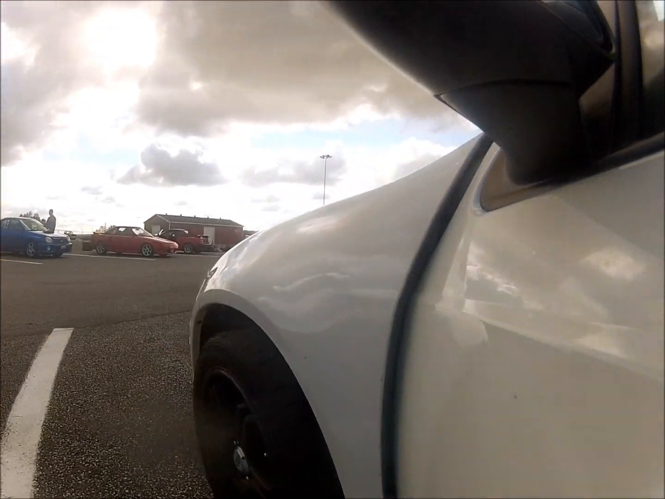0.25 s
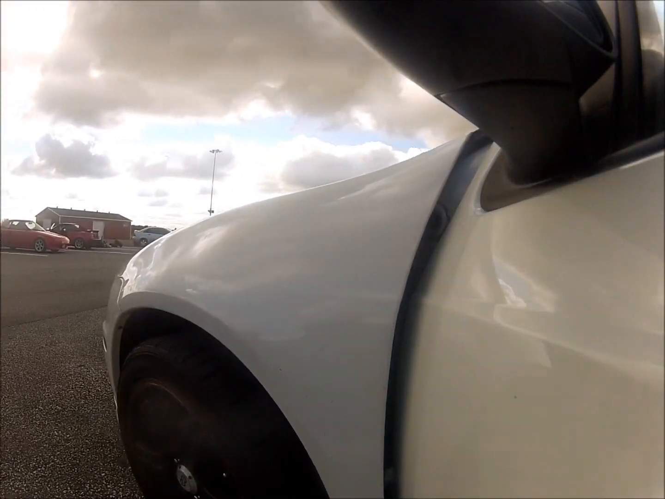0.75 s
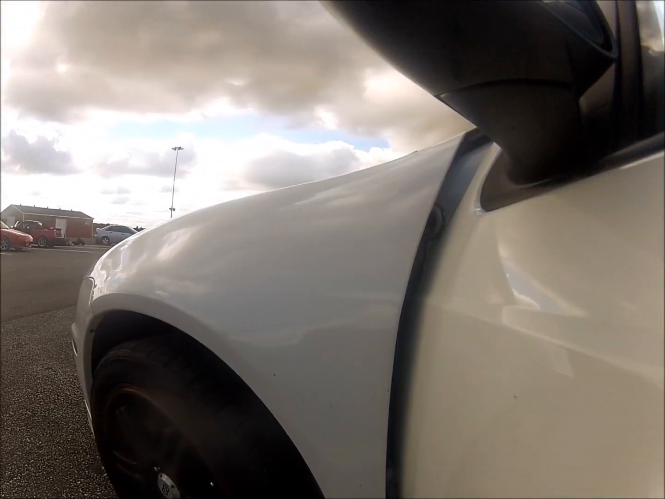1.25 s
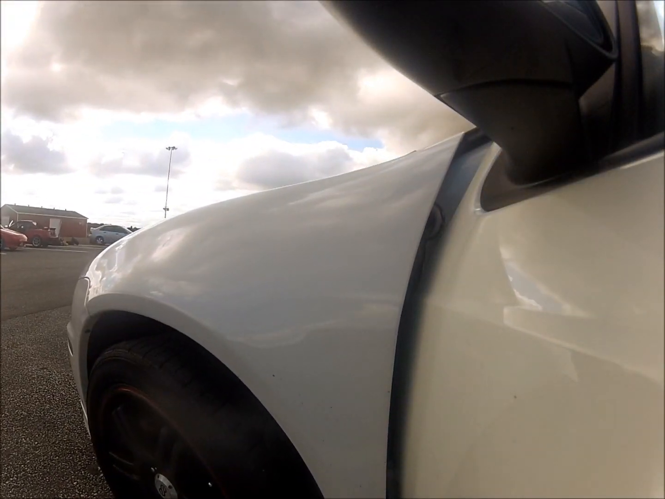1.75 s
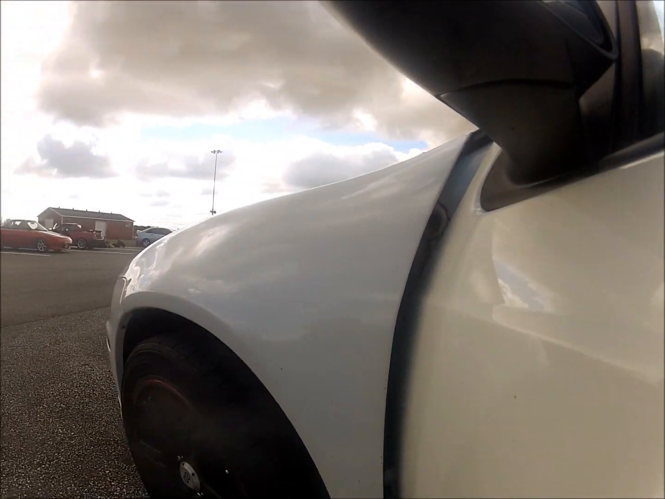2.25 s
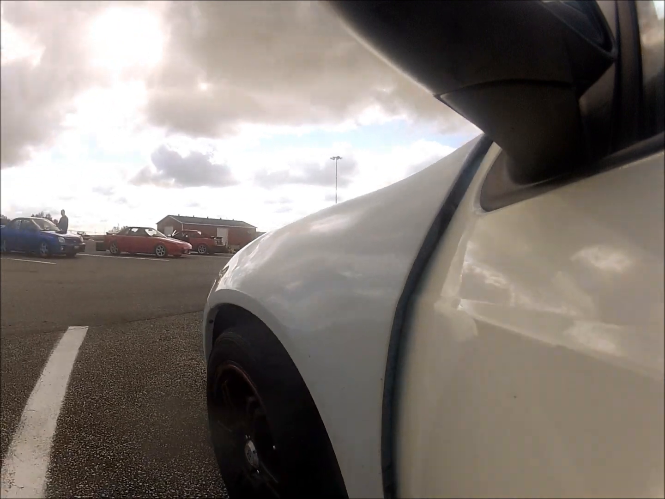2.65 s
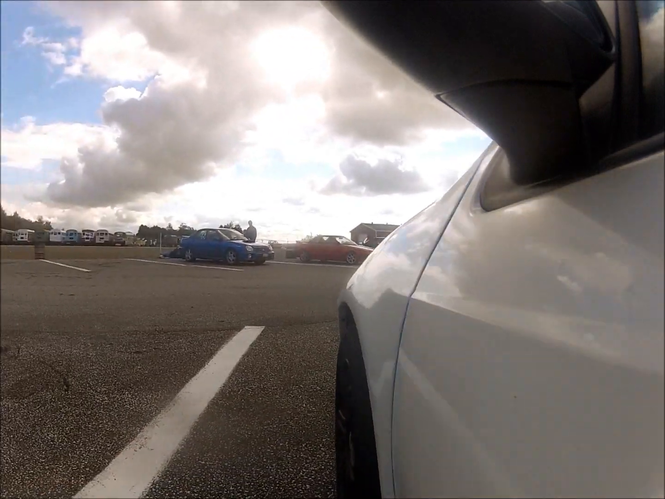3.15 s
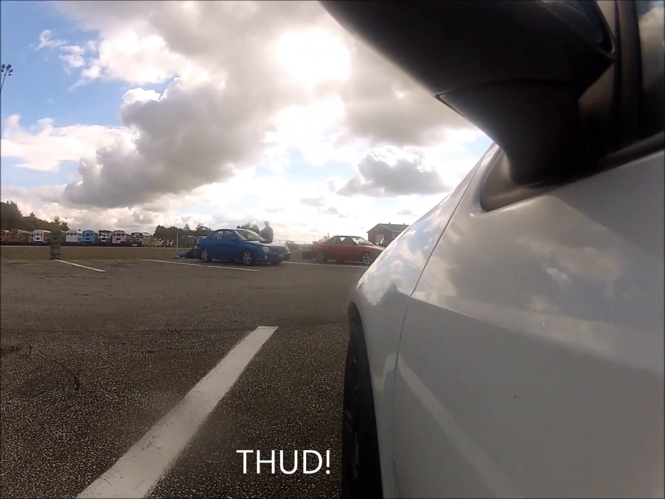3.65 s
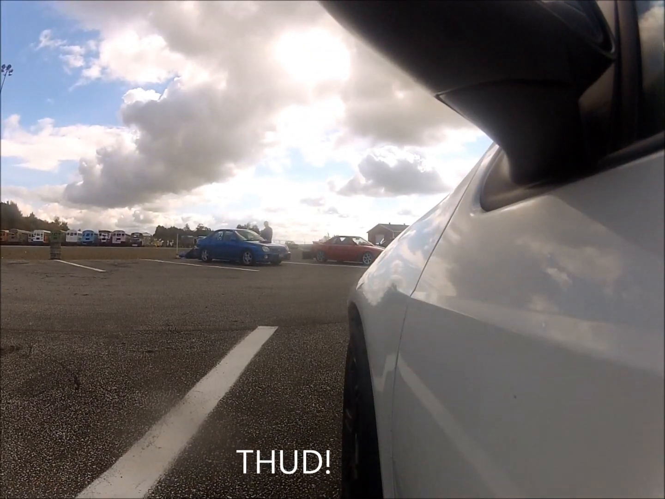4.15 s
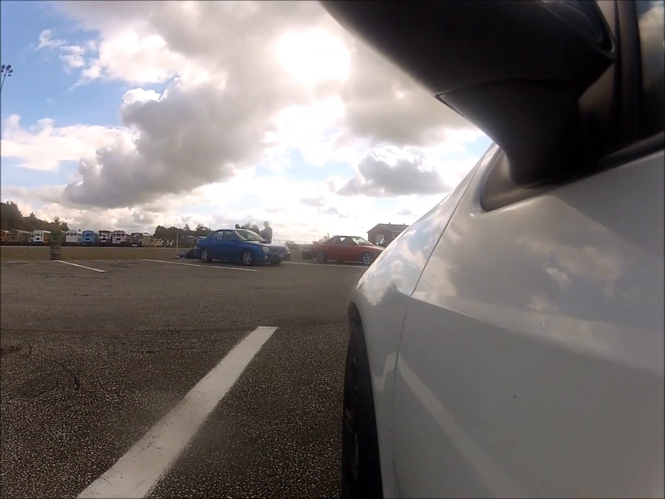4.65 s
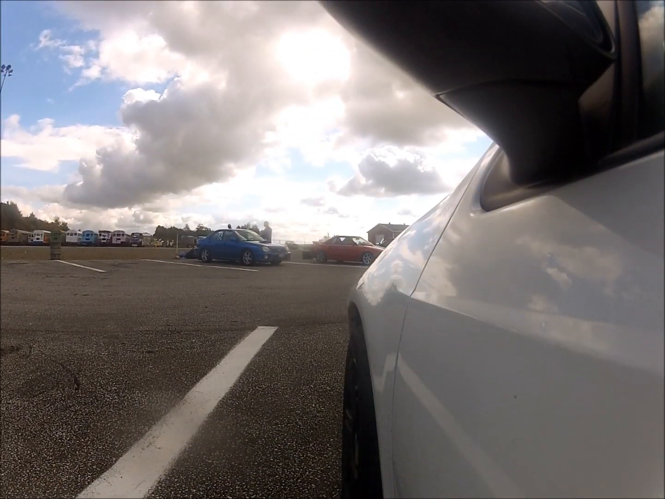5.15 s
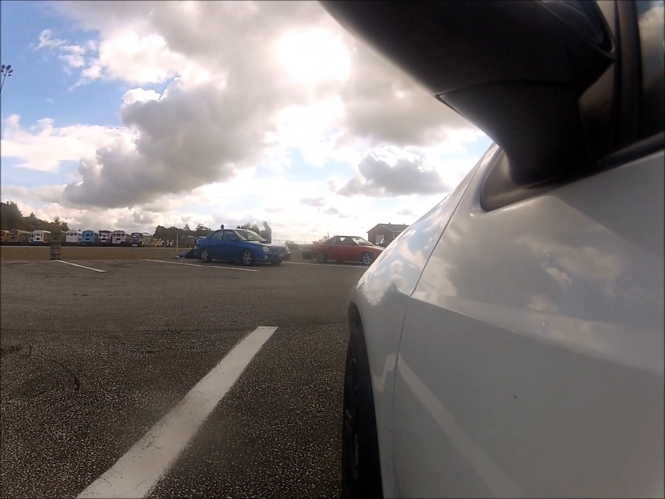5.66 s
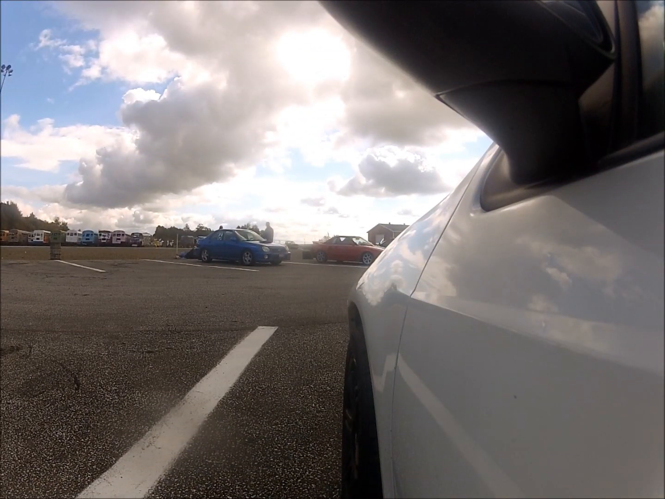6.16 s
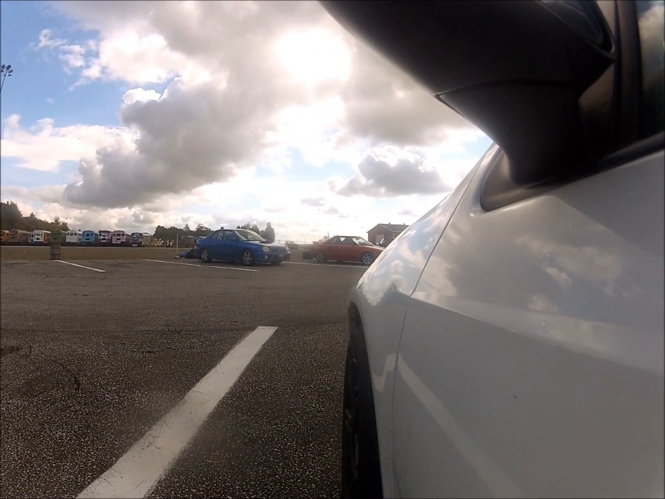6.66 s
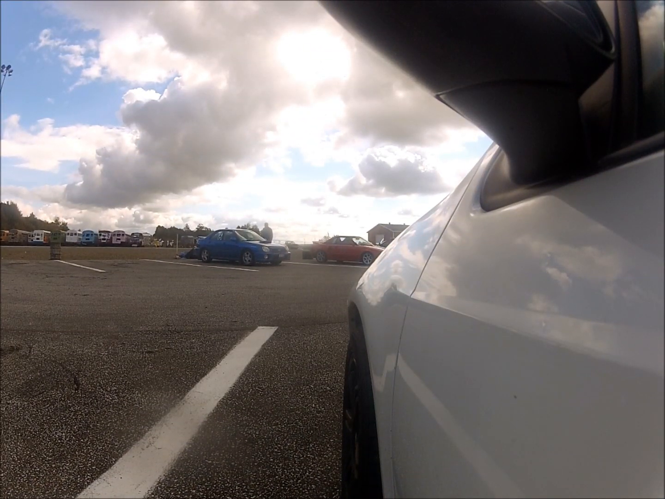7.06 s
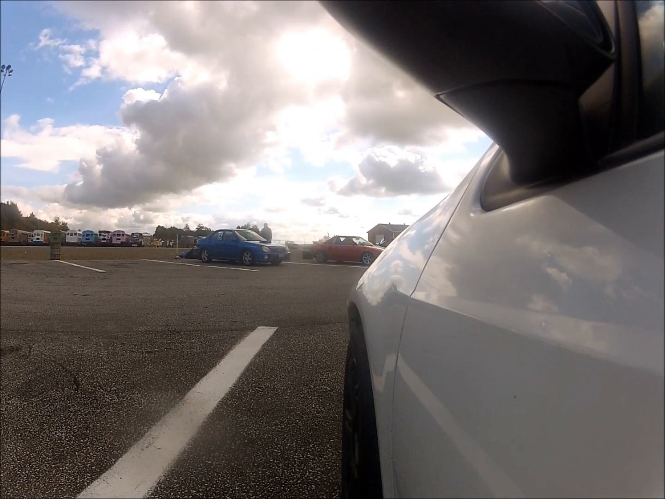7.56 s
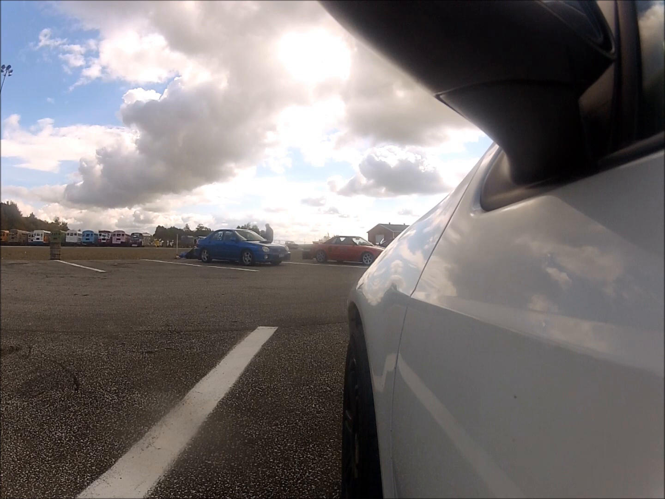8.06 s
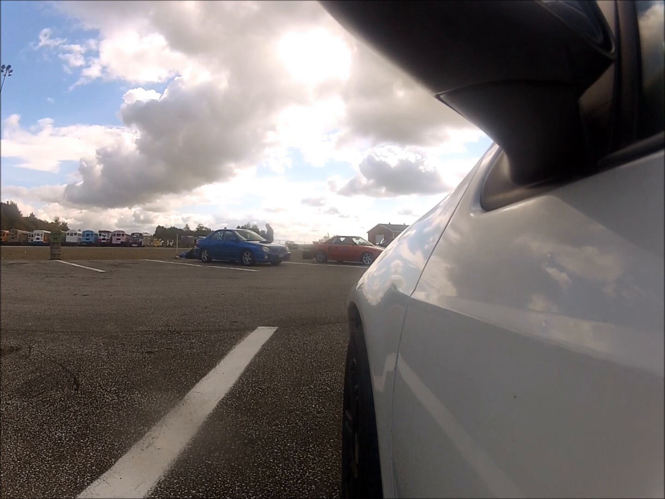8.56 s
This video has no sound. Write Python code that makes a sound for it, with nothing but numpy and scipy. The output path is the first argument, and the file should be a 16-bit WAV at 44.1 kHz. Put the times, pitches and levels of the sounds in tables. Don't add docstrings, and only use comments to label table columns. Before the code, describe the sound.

Muffled clicks as a car door swings open, a huge booming slam with rattling, small cabin knocks and clinks, then the starter motor begins cranking.

```python
import sys
import numpy as np
from scipy import signal
from scipy.fft import rfft, irfft
from scipy.io import wavfile
from scipy.ndimage import uniform_filter1d

SR = 44100
rng = np.random.default_rng(int(sys.argv[2]) if len(sys.argv) > 2 else 0)


def master_out(mix):
    frames = np.transpose(np.atleast_2d(mix))
    ceiling = np.clip(frames, -1, 1)
    pcm = np.round(ceiling * 32767).astype(np.int16)
    wavfile.write(sys.argv[1], SR, pcm)


def decibels_to_gain(level_db):
    exponent = np.asarray(level_db, float) / 20
    return 10 ** exponent


N = 388521

# (frequency [Hz], width [Hz], level [dB])
BRIGHT_RING = [(3011, 130, -4), (3630, 470, 1.5), (4050, 400, -5), (4530, 700, -14.5)]
# (frequency [Hz], width [Hz], level [dB])
CASING_RING = [(2960, 260, -4.5), (3820, 700, 2), (4650, 490, -2), (5020, 820, -5.5)]
# (frequency [Hz], width [Hz], level [dB])
RUB_RING = [(1008, 87, -8), (1134, 220, -1.5), (2159, 490, -3.5), (1560, 230, -5.5)]


def unit(x):
    return x / np.sqrt(np.mean(x ** 2))


def curves(table):
    s, *columns = np.transpose(table)
    now = np.arange(N)
    lines = [np.interp(now / SR, s, column) for column in columns]
    return lines, (now > s[0] * SR) * (now < s[-1] * SR)


def walk(rate):
    k = int(SR / rate)
    steps = np.repeat(rng.standard_normal(N // k + 1), k)
    return 1.6 * uniform_filter1d(uniform_filter1d(steps, k), k)[:N]


def add(out, s, sound):
    i = int(s * SR)
    out[i:i + len(sound)] += sound[:N - i]


def ring(modes, drive):
    noise = rng.standard_normal(N)
    filters = []
    for hz, width, db in modes:
        edges = [hz - width / 2, hz + width / 2]
        sos = signal.butter(2, edges, "band", fs=SR, output="sos")
        filters.append((decibels_to_gain(db) / np.sqrt(width), sos))

    def body(x):
        return sum(gain * signal.sosfilt(sos, x) for gain, sos in filters)

    on = np.flatnonzero(drive)
    span = slice(on[0], on[-1] + SR // 4)
    out = np.zeros(N)
    out[span] = body((noise * drive)[span]) / np.std(body(noise[:SR]))
    return out


def hits(table, modes, contact, bright):
    t = np.arange(SR // 3) / SR
    low_push, upper_push, bright_push = np.zeros((3, N))
    rise_s, t60, upper_db, sooner, tick = contact
    for s, db, hard_db in table:
        fade = 1000. ** (-t / (t60 * np.exp(-0.0385 * hard_db)))
        first_touch = 1 + tick * np.exp(-t / rise_s / 2)
        rise = decibels_to_gain(db) * (1 - np.exp(-(t / rise_s) ** 2)) * first_touch
        upper = decibels_to_gain(upper_db + 0.42 * hard_db)
        add(low_push, s - rise_s, rise * fade)
        add(upper_push, s - rise_s, rise * upper * fade ** sooner)
        add(bright_push, s - rise_s, rise * decibels_to_gain(hard_db) * fade ** 1.4)
    treble_cut = signal.butter(5, 2600, fs=SR, output="sos")
    dull = signal.sosfilt(treble_cut, ring(modes[0], low_push) + ring(modes[1], upper_push))
    return dull + ring(bright, bright_push)


def grind(table, modes, flicker_db, bright=BRIGHT_RING):
    (db, bright_db), on = curves(table)
    push = on * decibels_to_gain(db + flicker_db * walk(90))
    return ring(modes, push) + ring(bright, push * decibels_to_gain(bright_db))


def whine(table, waver, orders):
    (hz, db), on = curves(table)
    turn = 2 * np.pi * np.cumsum(hz * (1 + waver * walk(40))) / SR
    return on * np.sqrt(2) * sum(decibels_to_gain(db + 3.3 * walk(40)) * np.sin(k * turn) for k in orders)


def hiss():
    # (frequency [Hz], level [dB])
    colour = [(94, -31), (160, 4.5), (735, -13.5), (950, -18.5), (2300, -19.5), (4920, -20.5),
              (5900, -26.5), (13000, -130)]
    # (time [s], gain [dB])
    creep = [
        (0, 1),
        (1.4, 3.5),
        (1.65, 6.5),
        (3.9, 7),
        (5.4, 9.5),
        (7.8, 11.5),
        (8.81, 10),
    ]
    hz, db = np.transpose(colour)
    f = np.fft.rfftfreq(N, 1 / SR) + 1
    shape = decibels_to_gain(np.interp(np.log(f), np.log(hz), db))
    noise = unit(irfft(rfft(rng.standard_normal(N)) * shape, N))
    (lift_db,), _ = curves(creep)
    return decibels_to_gain(lift_db - 74) * noise


def stir():
    # (time [s], effort [dB])
    shifting = [(0.0, -68), (0.7, -64.5), (0.9, -79), (2.2, -62), (3.09, -51), (3.31, -26.5), (3.46, -41.5),
                (4.09, -67), (5.25, -55), (5.94, -65.5), (6.99, -47.5), (7.34, -56.5), (8.29, -60.5),
                (8.81, -44)]
    # (time [s], level [dB], time until still [s])
    jolts = [(0.22, -46, 0.55), (0.531, -53.5, 0.56), (1.47, -48.5, 0.83), (1.62, -43.5, 0.65),
             (2.27, -43, 1.3), (2.6, -40, 0.42), (2.95, -41.5, 2.2), (3.21, -17.5, 0.87), (3.7, -57.5, 1.1),
             (4.66, -47, 0.72), (5.1, -50.5, 0.89), (5.619, -61.5, .7), (6.35, -38, 0.35),
             (6.709, -53, 0.33), (7.12, -42, 0.66), (7.4, -49.5, 0.86), (7.73, -38.5, .5),
             (8.439, -17, 0.31), (8.7, -24, 0.15)]
    # (frequency [Hz], width [Hz], level [dB])
    wobble = [(24.6, 19, 0)]
    # (frequency [Hz], width [Hz], level [dB])
    frame_ring = [(75, 6.4, -1), (108, 14, -5.5), (53, 49, -8.5), (136, 17, -8)]
    # (frequency [Hz], width [Hz], level [dB])
    panel_ring = [(172, 65, -4), (208, 44, 6.5), (309, 120, -6), (410, 88, -16), (576, 860, -20.5)]
    (effort_db,), _ = curves(shifting)
    extra_db = effort_db + 60

    t = np.arange(2 * SR) / SR
    power = decibels_to_gain(2 * (np.minimum(effort_db, -55) - 4.5))
    for s, db, still_s in jolts:
        rise = 1 - np.exp(-(t / 0.042) ** 2)
        fade = 1000. ** -(t / still_s) ** 2
        add(power, s, (decibels_to_gain(db) * rise * fade) ** 2)
    sway_hz = 32.5 * (1 + .025 * walk(4))
    sway = np.sqrt(2 * power) * np.sin(2 * np.pi * np.cumsum(sway_hz) / SR)
    sway = sway * decibels_to_gain(3.5 * walk(9.7))
    sway = sway + ring(wobble, 0.22 * np.minimum(np.sqrt(power), decibels_to_gain(-50.5)))

    frame = ring(frame_ring, decibels_to_gain(effort_db + 2.5 * walk(15)))
    panel = ring(panel_ring, decibels_to_gain(-64 + 1.07 * extra_db + 2.5 * walk(25)))
    rub = ring(RUB_RING, decibels_to_gain(-75.5 + 0.29 * extra_db + 0.77 * walk(21)))
    return sway + frame + panel + rub


def thumps():
    # (time [s], panel peak [dB], frame peak [dB], frame frequency [Hz])
    check = [(0.217, -31.5, -43, 89.3), (0.261, -27.5, -45, 96.5), (0.288, -44, -53, 63),
             (0.481, -34, -45, 87), (0.553, -30, -46, 133.3), (0.804, -57, -61, 126),
             (1.48, -46.5, -39, 108), (1.658, -43, -45, 94), (1.744, -48.5, -42, 73), (1.799, -48, -38, 80),
             (2.151, -43, -72, 73), (2.287, -54, -36, 79.3), (2.373, -28, -42, 133),
             (2.423, -22.5, -39.5, 96), (2.621, -26.5, -37.5, 136), (2.662, -20.5, -39.5, 65.8),
             (2.838, -55.5, -59, 89), (3.008, -44, -38.5, 115), (3.127, -29.5, -35.5, 119.4)]
    slam = [(3.212, -25, -22, 65), (3.226, -10, -26, 66), (3.245, -9, -16, 112), (3.257, -2.5, -20, 114),
            (3.27, -17, -19, 75), (3.299, -31, -50, 103.4), (3.36, -25, -32, 67), (3.41, -25, -22, 63),
            (3.678, -37.5, -38.5, 108), (3.745, -32, -49, 97.1), (3.838, -41.5, -56.5, 90.8)]
    belt = [(4.608, -43.5, -43.5, 92), (4.692, -44, -43.5, 89), (4.857, -39.5, -47, 101.3),
            (5.084, -38.5, -40.5, 92), (5.259, -49, -49, 117), (5.316, -37.5, -47, 136),
            (5.402, -35, -42, 84), (5.568, -34, -60, 107.8), (5.873, -40.5, -51, 105.6),
            (6.307, -43.5, -46, 88.7), (6.375, -35.5, -41, 101), (6.392, -27.5, -32.5, 123),
            (6.42, -31, -36, 106.3), (6.724, -36, -37, 101.7)]
    pedals = [(6.95, -38, -59, 108), (6.997, -52.5, -40, 102), (7.148, -36, -37.5, 108),
              (7.172, -29.5, -44, 103), (7.295, -28.5, -28, 100), (7.34, -40, -37.5, 108),
              (7.389, -64, -35, 85.1), (7.613, -36, -39, 90), (7.649, -33, -33.5, 108),
              (7.74, -23.5, -28.5, 81.3), (7.786, -31.5, -37.5, 110.7), (7.839, -46.5, -49, 79),
              (8.423, -32.5, -40.5, 95.3), (8.465, -29, -33.5, 63.4), (8.707, -42.5, -46.5, 86.6)]
    kickback = [
        (8.753, -39, -53.5, 66),
    ]
    # (frequency [Hz], level under the panel [dB], t60 [s])
    lining = [(318, -18, 0.067), (391.6, -18, 0.07), (429, -21, 0.06)]
    # (frequency [Hz], width [Hz], level [dB])
    skin = [(311, 100, -1), (394, 69, -6.5), (171.6, 24, -2.5)]
    # (blows, panel frequency [Hz], t60 [s], lining [dB])
    kinds = [(check, 223, 0.17, 0.1), (slam, 219, .11, -14), (belt, 200, 0.15, 2),
             (pedals, 222, 0.2, 1.2), (kickback, 303, 0.89, -20)]
    t = np.arange(SR // 2) / SR
    out, shudder = np.zeros(N), np.zeros(N)
    for table, panel_hz, t60, lining_db in kinds:
        fade = 1000. ** (-t / t60)
        phases = rng.uniform(0, 2 * np.pi, (len(table), 4))
        for (s, db, frame_db, frame_hz), turn in zip(table, phases):
            hz = panel_hz * (1 + .03 * np.sin(turn[3]))
            panel = np.sin(2 * np.pi * hz * t + turn[0])
            panel = panel + .2 * np.sin(2 * np.pi * .87 * hz * t + turn[1])
            panel = panel * fade
            for k, (f, d, r) in enumerate(lining):
                tone = np.sin(2 * np.pi * f * hz / panel_hz * t + k * turn[1])
                panel = panel + decibels_to_gain(d + lining_db) * tone * 1000. ** (-t / r)
            panel = panel * (1 - np.exp(-t / 0.0021))
            frame = np.sin(2 * np.pi * frame_hz * t + turn[2]) * fade ** .6 * (1 - np.exp(-t / .007))
            add(out, s - .0005, decibels_to_gain(db) * panel + decibels_to_gain(frame_db + 6) * frame)
            add(shudder, s - .001, decibels_to_gain(db - 15.5) * fade ** 0.68)
    return out + ring(skin, shudder)


def knocks():
    # (time [s], peak [dB], hardness [dB])
    blows = [(0.217, -46, -33.5), (0.264, -46, -23), (0.278, -54.5, 0.5), (0.484, -51, -37),
             (0.552, -54, -27), (1.6, -64, -35), (1.63, -63, -28), (1.66, -61, -20), (1.79, -66, -34),
             (1.83, -69.5, -26), (1.855, -59, -12), (2.374, -44, -32), (2.422, -53, -26), (2.44, -46.5, -6),
             (2.62, -36.5, -21.5), (2.649, -37.5, -27), (2.722, -54.5, -21), (2.863, -69.5, 16.5),
             (3.155, -52.5, -8), (3.169, -41, -24), (3.683, -59, -22), (3.75, -66, -28.5),
             (3.798, -61.5, -29), (3.891, -60, -16), (6.383, -58.5, -22), (6.394, -50, -17.5),
             (6.41, -56, -22), (6.62, -66, -21), (6.684, -55.5, -14.5), (6.719, -57, -28),
             (6.7, -59, -18.5), (6.866, -59, -9.5), (6.885, -63, -16), (6.915, -62.5, -9.5),
             (6.935, -65, -13), (7.144, -50.5, -11.5), (7.283, -57, -11), (7.739, -44, -19)]
    # (frequency [Hz], width [Hz], level [dB])
    trim = [
        [(960, 160, -3.5), (1093.6, 220, -2), (1400, 1000, -12.5), (617, 870, -0.5)],
        [(1660, 910, -7.5), (2007, 200, 0.5), (2320, 37, -1.5)],
    ]
    # (rise [s], t60 [s], upper ring [dB], its faster fade [times], first touch [times the grit])
    contact = (0.0007, 0.05, 1, 1.9, 1.1)
    return hits(blows, trim, contact, BRIGHT_RING)


def scuff():
    # (time [s], level [dB], brightness [dB])
    brush = [
        (0.7, -80, -25),
        (0.83, -72, -25),
        (0.86, -83, -25),
    ]
    return grind(brush, RUB_RING, flicker_db=2.5)


def far_engine():
    # (time [s], frequency [Hz], level [dB rms])
    engine = [
        (.95, 130.4, -84),
        (1.15, 127.4, -72.5),
        (1.4, 131, -71.5),
        (1.5, 129.5, -70),
    ]
    return whine(engine, waver=0.03, orders=[1])


def door_seal():
    # (time [s], level [dB], brightness [dB])
    sigh = [
        (1.46, -80, -5),
        (1.52, -74, -7),
        (1.7, -74, -13),
        (1.9, -70.5, -5),
        (1.95, -89, -12),
    ]
    # (frequency [Hz], width [Hz], level [dB])
    rubber = [(2110, 460, 16), (1890, 130, -6), (2470, 210, -18)]
    return grind(sigh, rubber, flicker_db=1.8)


def crash():
    # (time [s], level [dB], brightness [dB])
    burst = [
        (3.194, -52, -23.5),
        (3.204, -28, -15),
        (3.214, -21.5, -9.5),
        (3.228, -28, -12),
        (3.26, -33.5, -10.5),
        (3.3, -43.5, -10.5),
        (3.36, -50.5, -8),
        (3.45, -58.5, -8.5),
        (3.49, -69, -10),
    ]
    # (frequency [Hz], width [Hz], level [dB])
    jamb = [(1123, 380, 2.5), (1530, 500, -1.5), (2020, 600, 0), (2600, 620, -8.5), (650, 400, -7.5)]
    return grind(burst, jamb, flicker_db=3.0)


def rattle():
    # (time [s], peak [dB], hardness [dB])
    contacts = [(3.207, -24.5, -19.5), (3.212, -14, -14.5), (3.217, -14, -11.5), (3.221, -28, -12),
                (3.229, -29.5, -9.5), (3.235, -27, 10.5), (3.24, -28.5, 3.5), (3.248, -23.5, -2),
                (3.2545, -24.5, 8.5), (3.265, -27, -6.5), (3.2765, -31, 11), (3.28, -36, 10),
                (3.284, -23, 11.5), (3.293, -32.5, 10), (3.297, -33, 10), (3.301, -38.5, 10),
                (3.312, -39, 15), (3.315, -32, 10), (3.323, -40, 14), (3.328, -28.5, 10.5),
                (3.334, -34.5, 19), (3.341, -23.5, 11.5), (3.354, -53.5, 9), (3.362, -38.5, -4.5),
                (3.366, -32.5, 13), (3.379, -51, -11), (3.388, -57.5, -17), (3.402, -40, -14),
                (3.423, -48, -31), (3.452, -53, -14)]
    # (frequency [Hz], width [Hz], level [dB])
    latch = [
        [(1076, 60, -9.5), (1223, 260, 2.5), (409, 95, -4.5)],
        [(1830, 500, 0.0012), (2183, 410, 0)],
    ]
    # (rise [s], t60 [s], upper ring [dB], its fade rate [times the lower], first touch [times the
    contact = (0.001, 0.017, 3, 0.84, 2)
    # (frequency [Hz], width [Hz], level [dB])
    chatter = [(3050, 370, -6), (3470, 500, 1), (4420, 700, 1), (5070, 470, -6)]
    return hits(contacts, latch, contact, chatter)


def clinks():
    # (time [s], peak [dB], hardness [dB])
    contacts = [(4.461, -55, -22.5), (4.513, -56.5, -24), (4.607, -45, -18.5), (4.696, -51, -26),
                (4.843, -67.5, -22.5), (4.863, -45.5, -23), (5.014, -58, -31), (5.057, -49.5, -23),
                (4.95, -63, -28), (5.088, -55.5, -13), (5.257, -53.5, -20), (5.321, -40.5, -10),
                (5.336, -44, -17), (5.402, -45.5, -16), (5.452, -54, -15.5), (5.562, -58, -5),
                (5.58, -61, -18), (5.874, -46, -24.5), (7.745, -42.5, -29.5), (8.169, -58, -15)]
    # (frequency [Hz], width [Hz], level [dB])
    buckle = [
        [(1194, 88, -0.5), (1388, 444, -12.5), (401, 227, -2), (1031, 130, -8.5), (761, 430, -14.5)],
        [(1708, 640, -5.5), (2142, 205, -1), (2300, 710, -8.5)],
    ]
    # (rise [s], t60 [s], upper ring [dB], its faster fade [times], first touch [times the grit])
    contact = (0.0027, 0.045, 3.06, 1.34, 0.48)
    return hits(contacts, buckle, contact, BRIGHT_RING)


def fuel_pump():
    # (time [s], frequency [Hz], level [dB rms])
    pump = [(5.5, 1012, -88), (5.8, 1012, -81), (6.4, 1012, -82), (7.5, 1012, -86), (8, 1012, -79),
            (8.4, 1012, -80)]
    return whine(pump, waver=0.0021, orders=[1])


def lever_scrape():
    # (time [s], level [dB], brightness [dB])
    scrape = [
        (7.55, -73, -13.5),
        (7.575, -60.5, -20),
        (7.595, -62, -24),
        (7.615, -50.5, -11),
        (7.66, -52, -9),
        (7.7, -54.5, -5.5),
        (7.712, -70, -10),
    ]
    # (frequency [Hz], width [Hz], level [dB])
    lever = [(1020, 440, -3.5), (1146, 155, -3), (1750, 510, -3), (2320, 82, -7), (474, 150, -1.5)]
    return grind(scrape, lever, flicker_db=0.55, bright=CASING_RING)


def key_squeak():
    # (time [s], level [dB], brightness [dB])
    squeak = [
        (7.972, -77.5, -20),
        (7.985, -58, -15),
        (8.03, -86, -20.5),
    ]
    # (frequency [Hz], width [Hz], level [dB])
    lock = [(2360, 160, 0)]
    return grind(squeak, lock, flicker_db=1.5)


def relay():
    # (time [s], frequency [Hz], level [dB rms])
    buzz = [
        (8.325, 1196, -75),
        (8.345, 1208, -60.5),
        (8.365, 1180, -63),
        (8.39, 1186, -79.5),
    ]
    return whine(buzz, waver=0.0056, orders=[1])


def pinion():
    # (time [s], level [dB], brightness [dB])
    bite = [
        (8.412, -62, -22),
        (8.425, -45, -4),
        (8.438, -43, 2),
        (8.448, -46, -1),
        (8.457, -43, -10),
        (8.468, -50, -7),
        (8.49, -57, -6),
        (8.53, -66, -6),
    ]
    # (frequency [Hz], width [Hz], level [dB])
    small_gear = [(1180, 165, 0.5), (1730, 640, -0.5), (2290, 210, 2), (600, 240, -8)]
    return grind(bite, small_gear, flicker_db=1., bright=CASING_RING)


def gears():
    # (time [s], level [dB], brightness [dB])
    turning = [
        (8.45, -63, -11.5),
        (8.48, -48, -9.5),
        (8.55, -54, -5),
        (8.61, -51, -5),
        (8.66, -62, -4),
        (8.71, -53, -2),
        (8.76, -49, -5),
        (8.81, -46, -14),
    ]
    # (frequency [Hz], width [Hz], level [dB])
    gear_ring = [(1193, 29, -3.5), (1090, 240, -9.5), (1470, 470, -12.5), (2334, 166, -4.5),
                 (441, 9.3, -15), (680, 270, -17), (3500, 60, -8), (1890, 570, -18)]
    (db, bright_db), on = curves(turning)
    lines = sum(ring([mode], on * decibels_to_gain(db + mode[2] + 3.5 * walk(45))) for mode in gear_ring)
    return lines + ring(CASING_RING, on * decibels_to_gain(db + bright_db + 2 * walk(90)))


def starter_motor():
    # (time [s], tooth rate [Hz], level [dB rms])
    teeth = [(8.47, 940, -76), (8.52, 955, -73), (8.55, 988, -67), (8.575, 1012, -65), (8.6, 1000, -80),
             (8.63, 962, -70), (8.66, 1000, -78), (8.7, 945, -70), (8.74, 960, -76), (8.78, 985, -68),
             (8.81, 960, -75)]
    mesh = whine(teeth, waver=.006, orders=[3, 5])
    armature = decibels_to_gain(-5) * whine(teeth, waver=0.0064, orders=[3 / 4])
    return mesh + armature


def whistle():
    # (time [s], frequency [Hz], level [dB rms])
    tone = [
        (8.51, 3780, -76),
        (8.54, 3830, -67),
        (8.57, 3960, -63),
        (8.605, 4230, -67),
        (8.63, 4300, -84),
        (8.72, 3850, -84),
        (8.765, 4050, -66),
        (8.8, 4100, -80),
    ]
    return whine(tone, waver=.003, orders=[1])


def scene():
    outside = hiss() + far_engine() + door_seal()
    door = thumps() + knocks() + scuff() + crash() + rattle()
    cabin = stir() + clinks() + fuel_pump() + lever_scrape() + key_squeak()
    starter = relay() + pinion() + gears() + starter_motor() + whistle()
    return np.tile(outside + door + cabin + starter, (2, 1))


def band_limit(x):
    return signal.sosfilt(signal.butter(12, 16290, fs=SR, output="sos"), x)


def record(dry):
    up, down = 40, 147
    clip = .6
    slow = np.clip(signal.resample_poly(dry, up, down, axis=1), -clip, clip)
    steps = np.repeat(slow, 4, axis=1)
    held = signal.resample_poly(steps, down, 4 * up, axis=1)[:, :N]
    top = signal.ellip(8, .2, 75, 15200, fs=SR, output="sos")
    held = signal.sosfilt(top, held)
    late = np.roll(held, 441, axis=1)
    held = held + decibels_to_gain(-40.5) * walk(60) * late * np.array([[1], [-1]])
    return band_limit(held)


dry = scene()
out = record(dry)
master_out(out)
```